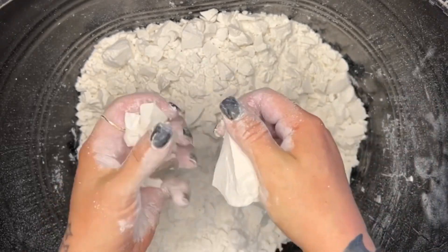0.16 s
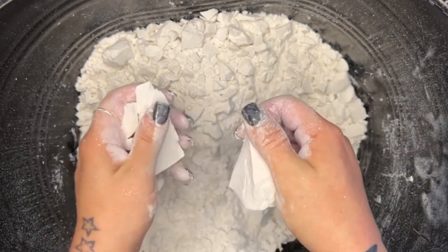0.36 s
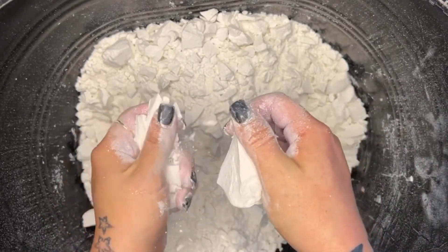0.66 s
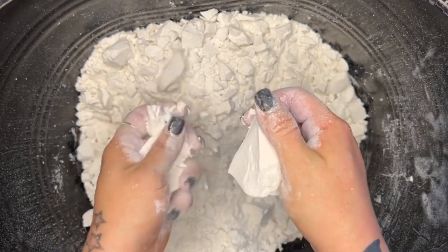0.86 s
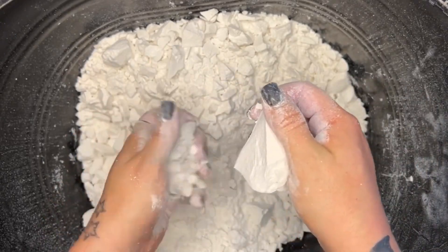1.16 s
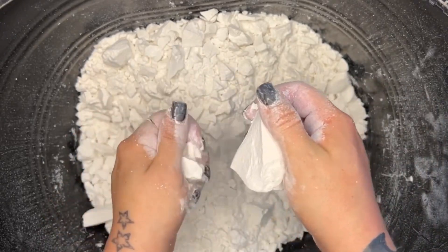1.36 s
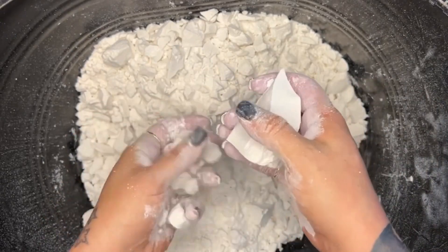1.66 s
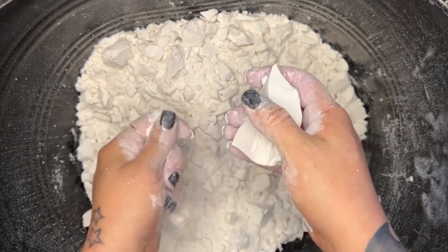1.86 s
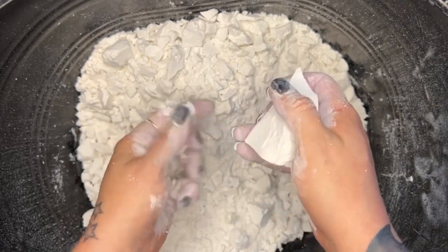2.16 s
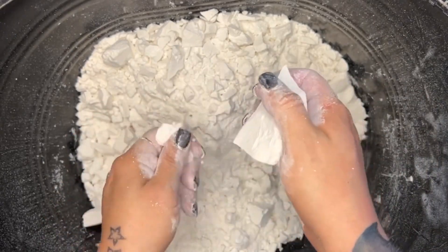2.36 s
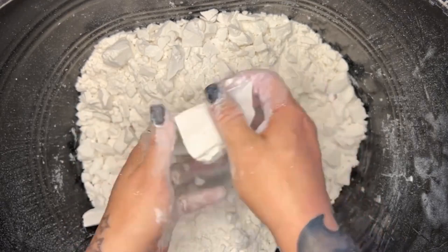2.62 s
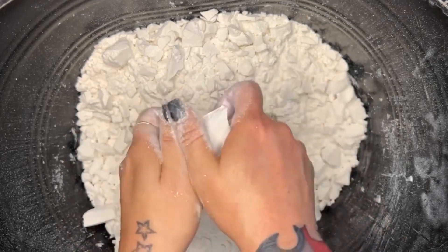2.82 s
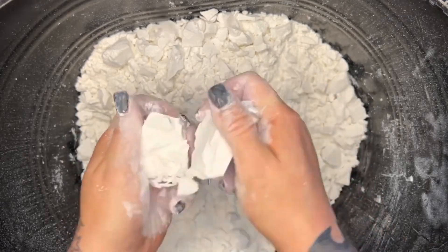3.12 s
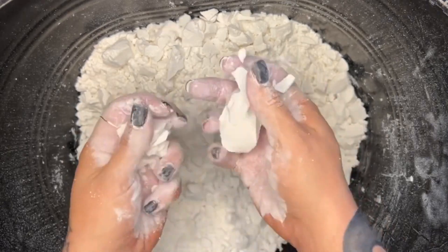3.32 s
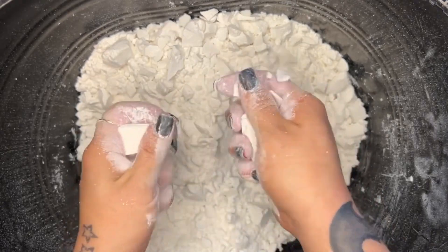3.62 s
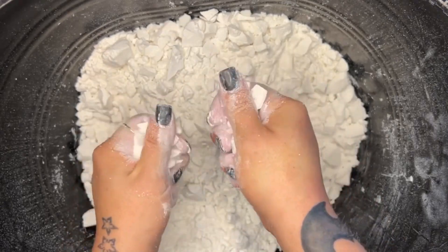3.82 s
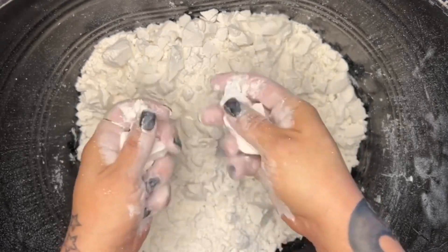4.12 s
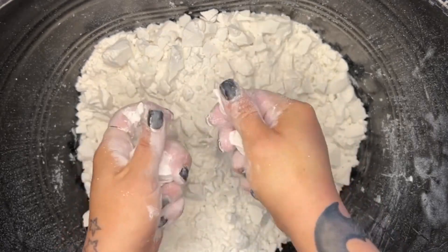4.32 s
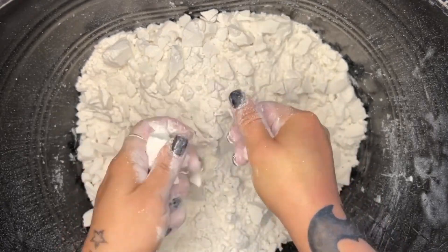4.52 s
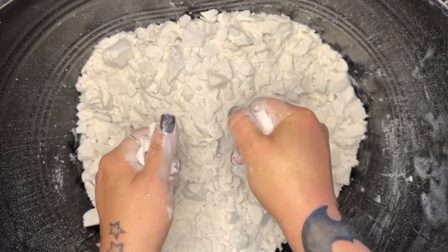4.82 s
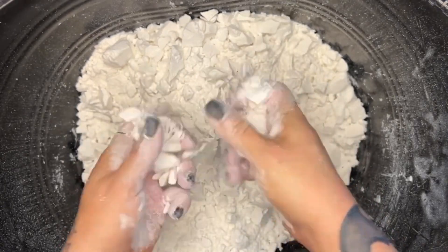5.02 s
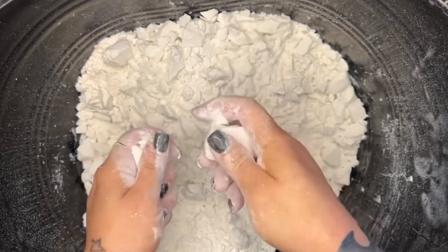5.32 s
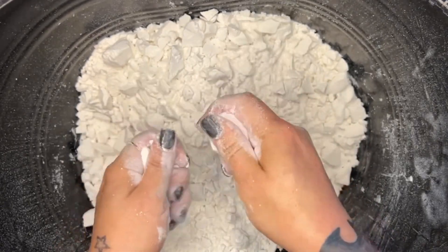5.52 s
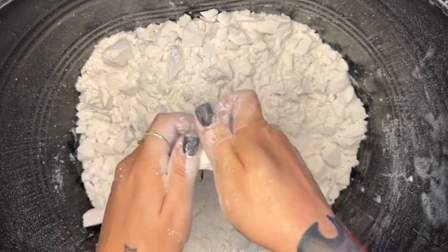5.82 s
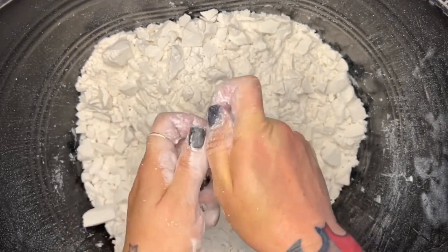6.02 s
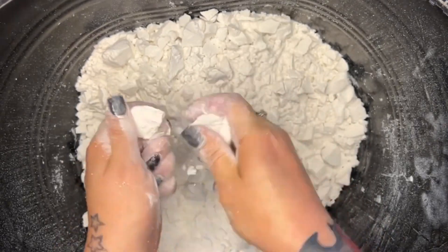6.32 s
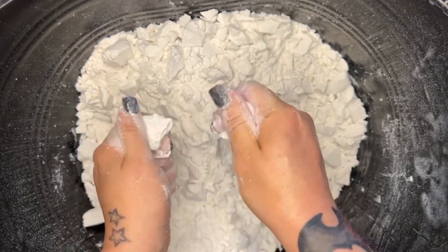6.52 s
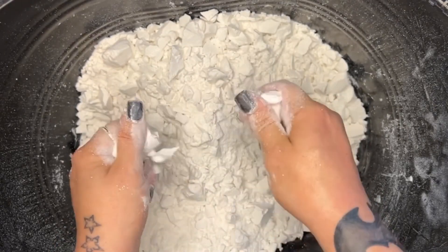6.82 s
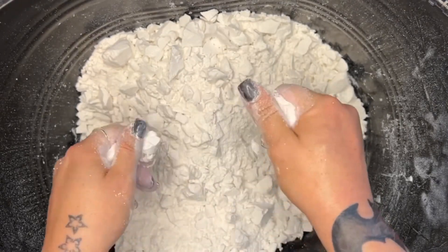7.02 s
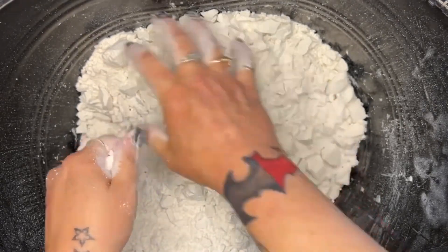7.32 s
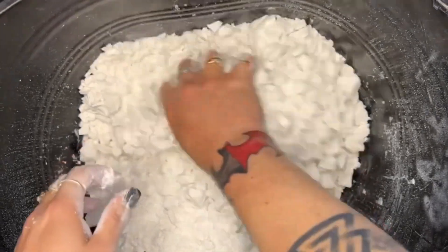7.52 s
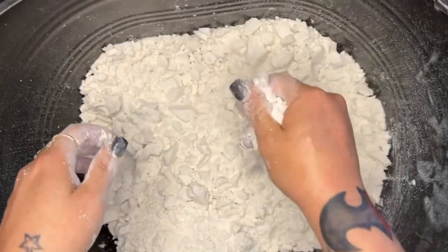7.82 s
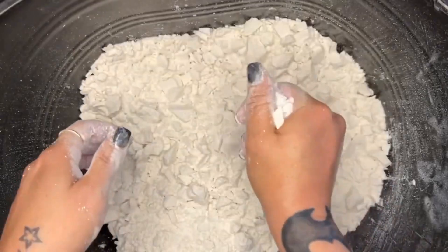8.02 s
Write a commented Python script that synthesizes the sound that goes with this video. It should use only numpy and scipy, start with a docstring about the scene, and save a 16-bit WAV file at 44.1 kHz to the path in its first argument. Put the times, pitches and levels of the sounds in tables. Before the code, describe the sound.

Crisp, dry cracks of brittle chalk breaking by hand, crumbs pattering and powder rustling, then a rough scrape and crunch through the heap.

```python
"""A faint rustle of powder comes first, over low room rumble; within a third of a second a piece cracks.
Close to the microphone, in mono, hands snap and crumble soft chalk blocks over a wide tub of chalk rubble.
Shaped noise bursts make cracks, crunches and ticking grit; damped resonances ring the knocks and rubs.
Flickering noise bands rustle as powder, wavering sines squeak; near the end a hand rakes through the heap.
Far behind lie the rumble and hiss of the room and a wavering hum, all of filtered noise."""
import sys
import numpy as np
from scipy import signal
from scipy.io import wavfile
from scipy.ndimage import uniform_filter1d

SR = 44100
rng = np.random.default_rng(int(sys.argv[2]) if len(sys.argv) > 2 else 0)


def voltage_ratio(decibels):
    """Convert decibels (scalar or array-like) to amplitude ratios, 20 dB per decade."""
    exponent = np.asarray(decibels, float) / 20
    return 10 ** exponent


def unload_audio(sound):
    """Save the sound as a 16-bit wav file, at the path given as the first command line argument."""
    columns = np.transpose(np.atleast_2d(sound))
    # keep every value between -1 and 1, then stretch to whole-number steps
    steps = np.round(np.clip(columns, -1, 1) * 32767)
    wavfile.write(sys.argv[1], SR, steps.astype(np.int16))


N = 360297   # length in samples
GRIP_DB_PER_S, SAG_DB_PER_S = 551.5, 24   # how fast a finger effort rises, and sags while held


def rms_one(x):
    """Scale to rms 1."""
    return x / np.sqrt(np.mean(x ** 2) + 1e-20)


def band(x, low_hz, high_hz, order=2):
    """Butterworth band-pass."""
    edges_hz = [low_hz, min(high_hz, .45 * SR)]
    return signal.sosfilt(signal.butter(order, edges_hz, "band", fs=SR, output="sos"), x)


def resonance(x, hz, width_hz):
    """Two-pole resonance, gain about 1 on top."""
    r = np.exp(-np.pi * width_hz / SR)
    return signal.lfilter([(1 - r * r) / 2, 0, (r * r - 1) / 2],
                          [1, -2 * r * np.cos(2 * np.pi * hz / SR), r * r], x)


def drift(rate_hz):
    """Slow random wander of rms 1: noise through two equal low-pass poles, drawn every 40 samples."""
    r = np.exp(-80 * np.pi * rate_hz / SR)
    slow = signal.lfilter([1], [1, -2 * r, r * r], rng.standard_normal(N // 40 + 2002))
    slow = rms_one(slow[2000:])   # skip the filter's start
    return np.interp(np.arange(N) / 40, np.arange(len(slow)), slow)


def coloured(spectrum, source, patchy_db):
    """Half-octave bands of two sources in turn, each flickering; typical level 1 from 1500 to 6000 Hz."""
    out, edges = 0, 11.3 * 2 ** np.arange(0, 11.1, .5)
    hz_points, db_points = np.transpose(spectrum)
    for k, (low, high) in enumerate(zip(edges, edges[1:])):
        hz = np.sqrt(low * high)
        level_db = np.interp(np.log(hz), np.log(hz_points), db_points, left=-90)
        if level_db > -80:
            flicker = voltage_ratio(level_db + patchy_db * drift(18.5))
            out = out + flicker * band(source[k % 2], low, high)
    presence = uniform_filter1d(band(out, 1500, 6000) ** 2, size=441)
    return out / np.sqrt(np.median(presence))


def pushes(rows, rise, sag, fall):
    """Gain of a row of efforts: each rises, sags while held and dies away in dB per second; powers add."""
    t, power = np.arange(0, N + 40, 40) / SR, 0
    for s, held_s, db in rows:
        late = t - s
        rising = rise * np.maximum(-late, 0)
        sagging = sag * np.clip(late, 0, held_s)
        falling = fall * np.maximum(late - held_s, 0)
        power = power + voltage_ratio(db - rising - sagging - falling) ** 2
    return np.interp(np.arange(N) / SR, t, np.sqrt(power))


def tick(burst, hz):
    """A grain bursting: a millisecond of noise in a wide band, then a faint puff of dust."""
    snap = signal.lfilter([1], [1, -np.exp(-1 / (.0012 * SR))], burst + 1e-18)
    puff = signal.lfilter([1], [1, -np.exp(-1 / (.006 * SR))], burst + 1e-18)
    noise = (snap + 0.091 * puff) * rng.standard_normal(len(burst))
    return band(noise, hz / 2.0, hz * 1.73)


# spectrum of the room far behind the tub: f/Hz, relative level per Hz/dB
ROOM_SPECTRUM = [(11, 8), (22, -1.5), (40, -12), (65, -16), (95, -15), (150, -18.5), (250, -26.5),
                 (480, -38.5), (1150, -41), (2500, -60), (7000, -53), (15500, -57)]
# noisy hum bands of some machine: f/Hz, width/Hz of each of two resonances, rms level/dB
HUM_BANDS = [(117.95, 18.2, -47), (161.4, 24, -56.5), (824, 120, -67)]


def room():
    """Distant rumble and air hiss as patchy noise; each hum is noise through two equal resonances."""
    air = voltage_ratio(-38.5) * rms_one(coloured(ROOM_SPECTRUM, rng.standard_normal((2, N)), patchy_db=5.5))
    hum = 0
    for hz, width_hz, db in HUM_BANDS:
        narrow = resonance(rng.standard_normal(N), hz, width_hz)
        hum = hum + voltage_ratio(db) * rms_one(resonance(narrow, hz, width_hz))
    return air + hum


# hands and arms shake the tub, hardest when shoving the heap:
# t/s, held/s, rumble level/dB, top of the rumble f/Hz
TUB_SHOVES = [(5.7, 0.94, -37, 28.6), (6.75, 0.7, -36, 28.3), (7.385, 0.052, -21, 169),
              (7.441, 0.13, -22.5, 29), (7.95, 0.11, -31.5, 40.3)]


def shaking():
    """The tub shudders under the hands: low noise from 11.8 Hz up follows each shove."""
    rumble = 0
    for s, held_s, db, top_hz in TUB_SHOVES:
        shudder = rms_one(band(rng.standard_normal(N), 11.8, top_hz))
        rumble = rumble + pushes([(s, held_s, db)], rise=618, sag=9, fall=123) * shudder
    return rumble


# rubble slides under the raking hand: t/s, held/s, level/dB at the start
RUBBLE_SLIDES = [(7.356, 0.27, -32)]


def rake_effort():
    """Gain of the sliding rubble: it starts abruptly, grows while held, then settles."""
    return pushes(RUBBLE_SLIDES, rise=4000, sag=-11, fall=246)


def raking():
    """Lumps knock and slide over each other: random bumps ring damped modes, the low ones louder."""
    bumps_per_s = 1100
    bumps = (rng.random(N) < bumps_per_s / SR) * rng.standard_normal(N) * voltage_ratio(2.1 * drift(59))
    slide = 0
    for hz in np.geomspace(320, 2200, 12):
        lump = resonance(bumps * rng.standard_normal(N), hz, hz / 6.1)
        slide = slide + lump * (500 / hz) ** 0.73
    return rake_effort() * rms_one(slide)


# smooth faces squeak as they rub: t/s, f/Hz, level/dB before flutter, rise/ms, fall/ms
SMOOTH_SQUEAKS = [(.345, 10300, -45, 31, 19), (.853, 10850, -37.5, 20, 3.5), (3.278, 13180, -37, 3, 5.5),
                  (3.275, 10800, -44, 12, 11), (3.297, 10100, -44, 2.5, 8), (3.325, 10250, -48, 2.5, 8),
                  (4.122, 7360, -21.5, 6.6, 8.8), (7.861, 10470, -38, 3.3, 21)]


def squeaks():
    """Stick-slip of chalk on chalk: a thin whistle, wavering in pitch and level."""
    out, t = np.zeros(N), np.arange(N) / SR
    waver = np.cumsum(1 + 0.0046 * drift(82)) / SR
    flutter = voltage_ratio(3.5 * drift(88))
    for s, hz, db, rise_ms, fall_ms in SMOOTH_SQUEAKS:
        near = slice(round((s - .1) * SR), round((s + .15) * SR))
        late_ms = (t[near] - s) * 1000
        shape = np.exp(-np.where(late_ms < 0, (late_ms / rise_ms) ** 2, late_ms / fall_ms))
        whistle = np.sin(2 * np.pi * hz * waver[near])
        out[near] += voltage_ratio(db) * shape * flutter[near] * whistle
    return out


# broken faces rub briefly against each other: t/s, held/s, level/dB at the start, f/Hz
FACE_RUBS = [(2.299, 0.022, -53, 2630), (2.389, 0.057, -50, 2630), (3.86, 0.042, -51, 2980),
             (7.565, 0.083, -36.5, 1490)]


def rubs():
    """Gritty noise gathered in one resonance of the lump."""
    gritty = rng.standard_normal(N) * voltage_ratio(4.4 * drift(70))
    out = 0
    for s, held_s, db, hz in FACE_RUBS:
        effort = pushes([(s, held_s, db)], GRIP_DB_PER_S, SAG_DB_PER_S, fall=400)
        out = out + effort * rms_one(resonance(gritty, hz, hz / 6.2))
    return out


# spectrum of rustling powder: f/Hz, relative level per Hz/dB
RUSTLE_SPECTRUM = [(300, -3), (700, 5.5), (1400, -11.5), (2300, 1.5), (4500, 1), (7300, 1), (11000, -6),
                   (15000, -16.5)]
# the fingers squeeze and grind: t/s, held/s, rustle level/dB at the start
FINGER_SQUEEZES = [(0.0, 0.37, -61.5), (.215, 0.01, -51), (.47, 0.046, -48.5), (.54, 0.023, -49.5),
                   (.65, 0.31, -59.5), (.845, 0.17, -50.5), (1.125, 0.0086, -57), (1.2, 0.17, -53),
                   (1.44, 0.19, -58.5), (1.7, 0.082, -54), (1.8, 0.023, -48.5), (1.92, 0.35, -59.5),
                   (2.3, 0.036, -54), (2.5, 0.45, -63.5), (2.9, 0.15, -63.5), (3.105, 0.0075, -53.5),
                   (3.22, 0.096, -58), (3.42, 0.12, -62), (3.56, 0.14, -53.5), (3.7, 0.18, -49),
                   (4.055, 0.043, -54), (4.115, 0.01, -45), (4.2, 0.24, -61.5), (4.54, 0.74, -51.5),
                   (4.82, 0.026, -61), (5.105, 0.59, -55.5), (5.61, 0.12, -55), (5.81, 0.077, -59),
                   (6.185, 0.011, -60.5), (6.37, 0.17, -56), (6.6, 0.62, -53.5), (7.17, 0.11, -53.5),
                   (7.72, 0.12, -52.5), (7.86, 0.22, -53.5)]


def crumbling():
    """Powder rustles in clumps; small grains tick at random, in bunches, the coarse ones lower and louder."""
    idle_db, raked_powder_db = -79.5, -14.5   # untouched powder; powder stirred up, below the rubble
    grains_db, grains_per_s = 6, 380   # gain beside the rustle; rate before bunching
    effort = pushes(FINGER_SQUEEZES, GRIP_DB_PER_S, SAG_DB_PER_S, fall=140) + voltage_ratio(idle_db)
    effort = effort + voltage_ratio(raked_powder_db) * rake_effort()
    clumps = voltage_ratio(0.91 * drift(14.0) + 3.9 * drift(130))
    powder = coloured(RUSTLE_SPECTRUM, rng.standard_normal((2, N)) * clumps, patchy_db=3.3)

    born = rng.random(N) < grains_per_s * voltage_ratio(4.0 * drift(8)) / SR
    sizes = born * voltage_ratio(4 * np.minimum(rng.exponential(1, N), 3))
    pitch_index = rng.integers(0, 8, N)
    grains = 0
    for k, hz in enumerate(np.geomspace(1800, 10000, 8)):
        grains = grains + tick(sizes * (pitch_index == k), hz) * (4000 / hz) ** .7
    return effort * (powder + voltage_ratio(grains_db) * grains)


# the loudest single grains of grit: t/s, peak level/dB, centre f/Hz
GRIT_GRAINS = [(0.1166, -29, 6470), (0.289, -32.5, 4500), (0.485, -17, 6000), (0.571, -21, 2790),
               (0.677, -29.5, 4870), (1.029, -26, 4300), (1.2184, -36, 5500), (1.226, -29.5, 4770),
               (1.2593, -31, 2600), (1.332, -28.5, 5140), (1.364, -27, 2510), (1.435, -24, 3330),
               (1.444, -24.5, 3230), (1.531, -29.5, 3300), (1.6058, -26.5, 6900), (1.674, -31, 4000),
               (1.7945, -25.5, 5530), (1.801, -24, 6100), (1.815, -42, 5340), (1.874, -24.5, 5570),
               (1.9374, -21.5, 4670), (1.959, -14.5, 5940), (2.323, -25.5, 3520), (2.4242, -28.5, 2830),
               (3.092, -27, 4960), (3.114, -22, 2650), (3.223, -24.5, 4750), (3.2764, -22.5, 8140),
               (3.2856, -24.5, 2240), (3.2958, -24.5, 4180), (3.3963, -31, 3850), (3.789, -28, 4000),
               (3.805, -23.5, 3170), (3.883, -31, 3300), (3.9677, -34, 3300), (3.987, -29.5, 4440),
               (4.079, -27, 7500), (4.096, -24, 2820), (4.145, -33, 3200), (4.159, -35, 5000),
               (4.173, -31, 6000), (4.185, -40, 4000), (4.2313, -37, 4000), (4.4107, -30, 4170),
               (4.503, -27.5, 5070), (4.783, -19, 4230), (4.8683, -20, 5150), (5.1445, -27, 5000),
               (5.22, -23.5, 7150), (5.4034, -25, 4540), (5.8067, -30, 3840), (5.832, -28, 3470),
               (6.183, -27, 6000), (6.479, -25, 4020), (6.551, -25, 3400), (6.6316, -21, 6200),
               (6.653, -19.5, 3600), (6.691, -26.5, 5700), (6.737, -19.5, 5300), (6.762, -20, 4700),
               (6.799, -24, 3770), (6.855, -20.5, 4830), (7.0988, -24, 4300), (7.113, -27.5, 4120),
               (7.199, -21.5, 6830), (7.326, -28.5, 4600), (7.725, -22.5, 4270), (7.78, -28, 4900),
               (7.8382, -21.5, 4150), (7.962, -20.5, 8600), (8.0125, -24, 3020), (8.0397, -20, 2700)]


def grit():
    """Single grains burst, each a short tick of noise around its own pitch."""
    out, burst = np.zeros(N + 2048), np.arange(2048) == 0
    for s, peak_db, hz in GRIT_GRAINS:
        one, at = tick(burst, hz), round(s * SR)
        out[at:at + 2048] += voltage_ratio(peak_db) * one / np.abs(one).max()
    return out[:N]


# dull knocks of lumps against hand, heap or tub: t/s, peak level/dB, f/Hz
LUMP_KNOCKS = [(0.582, -21, 332), (0.905, -19, 940), (0.95, -24, 350), (1.605, -33, 320),
               (2.207, -35.5, 211), (2.313, -34.5, 347), (2.525, -30, 358), (2.826, -34, 566),
               (2.929, -14, 290), (3.1, -26, 272), (3.624, -15, 790), (3.663, -17.5, 740),
               (3.691, -22, 870), (4.534, -28.5, 824), (4.697, -25.5, 513), (4.782, -25, 340),
               (5.088, -35, 1090), (5.161, -28.5, 338), (5.618, -35.5, 344), (6.075, -28.5, 328),
               (6.454, -29.5, 320), (6.994, -17.5, 246), (7.234, -33, 284), (7.572, -14, 507),
               (7.866, -24.5, 635), (7.905, -24, 210)]


def knocks():
    """A soft blow rings a damped low mode for a few cycles, with a scratchy top."""
    out, t = np.zeros(N + 4096), np.arange(4096) / SR
    for s, peak_db, hz in LUMP_KNOCKS:
        blow = rng.standard_normal(4096) * voltage_ratio(-60 * t / 0.039)
        blow[0] += 4.0
        ring = resonance(blow, hz, hz / 2.9) + 0.08 * band(blow, hz, 2700, order=1)
        at = round(s * SR)
        out[at:at + 4096] += voltage_ratio(peak_db) * ring / np.abs(ring).max()
    return out[:N]


# chunks crunched in the heap as the raking hand closes: t/s, peak level/dB, f/Hz
HEAP_CRUNCHES = [(7.557, -18, 1720), (7.569, -12.5, 1700), (7.587, -10, 1720), (7.603, -12.5, 1800)]


def crunches():
    """A chunk gives way in a few uneven breaks that ring its own pitch, with a broad crackle around it."""
    ring_q, t60_s = 8, 0.019
    out, t = np.zeros(N + 4096), np.arange(4096) / SR
    for s, peak_db, hz in HEAP_CRUNCHES:
        uneven_db = 1.8 * rms_one(band(rng.standard_normal(4096), 100, 500))
        breaks = rng.standard_normal(4096) * voltage_ratio(uneven_db - 60 * t / t60_s)
        ring = resonance(breaks, hz, hz / ring_q) + 0.13 * band(breaks, hz / 2, hz * 2)
        at = round(s * SR)
        out[at:at + 4096] += voltage_ratio(peak_db) * ring / np.abs(ring).max()
    return out[:N]


# resonances of chalk and tub that colour every crack: f/Hz before a small random shift, width/Hz, level/dB
CHALK_BODY = [(870, 390, 1), (2163, 192, 0), (6200, 3600, -12)]
# cracks close to the microphone: t/s, snap peak level/dB before clipping, centre f/Hz,
# level/dB of the crumb shower relative to that peak
CHALK_CRACKS = [(0.2541, -7.5, 7040, -48), (0.4328, -9, 8100, -14), (0.4388, -12, 7400, -21),
                (0.458, -11, 5430, -15), (0.499, -12, 5350, -14), (0.5087, 3, 3520, -22.5),
                (0.582, 7, 3340, -28), (0.883, -11.5, 6500, -29), (0.9043, 4, 3560, -22.5),
                (0.916, -10, 3650, -35), (0.9532, -5, 4320, -20), (0.9782, -21.5, 3730, -8.5),
                (1.8318, -16, 5360, -30), (1.95, -7.5, 5250, -16.5), (2.933, -11.5, 3080, -9.5),
                (2.9417, -8.5, 3440, -8), (2.957, 3.5, 3340, -25.5), (3.514, -14.5, 4100, -45),
                (3.6258, -3, 4200, -27), (3.6657, 2, 3550, -26.5), (3.69, 0.5, 3660, -17.5),
                (3.751, -12, 5060, -18), (3.762, -12.5, 5660, -43), (3.833, -8.5, 5330, -43),
                (3.854, -17.5, 4570, -19), (4.2587, -2, 2870, -36), (4.532, 3, 4330, -51),
                (4.5633, -16, 4400, -8.5), (4.6053, -9.5, 5800, -29), (4.6516, -17, 4740, -41),
                (4.688, -10, 5100, -22), (4.6974, -11, 4670, -19), (4.7209, -13, 4660, -30),
                (4.73, -8.5, 3720, -17.5), (5.1604, -16, 4550, -13.5), (5.1637, -10.5, 4530, -25),
                (5.8425, -16.5, 3400, -26), (6.077, -13.5, 5150, -22.5), (6.3469, -14.5, 5920, -25),
                (6.4539, -10, 3700, -29), (6.575, -13.5, 3900, -28), (6.769, -19.5, 3250, -29),
                (6.867, -17, 4380, -21), (6.992, -7.5, 2130, -16), (7.1721, -11, 3600, -17.5),
                (7.1767, -8, 5500, -44), (7.6327, -8, 1910, -21), (7.9034, -26, 3230, -5.5),
                (7.935, -31.5, 4100, 0)]


def cracks():
    """A snap, then a dying spray of smaller breaks banded by the piece's size; then crumbs shower down."""
    fall_db_per_cycle, fall_spread_db = 1.72, -0.97   # big low pieces keep breaking longer; chance per crack
    push_db, push_ms, shower_t60_s = -26.5, 0.46, 0.085
    out, t = np.zeros(N + 4096), np.arange(4096) / SR
    # the halves jerk apart: a short push of air under each crack
    jerk = t * 1000 / push_ms
    push = voltage_ratio(push_db) * jerk * (2 - jerk) * np.exp(1 - jerk)
    for s, peak_db, hz, shower_db in CHALK_CRACKS:
        noise = rng.standard_normal((3, 4096))
        fall = fall_db_per_cycle * voltage_ratio(fall_spread_db * noise[2, 0])
        spray = noise[0] * voltage_ratio(-fall * hz * t) * (1 - np.exp(-t / .0004))
        spray[3] += 3.9 * np.sign(noise[0, 3])   # the first break
        snap = band(spray, hz / 1.636, hz * 1.225, order=1)
        snap = 0.61 * band(snap, 83, hz * 3.27, order=1)
        direct = band(band(spray, hz / 1.636, hz * 1.225, order=1), 83, hz * 3.27, order=1)
        shift = voltage_ratio(0.25 * noise[2, 1])
        for body_hz, width_hz, db in CHALK_BODY:
            snap = snap + voltage_ratio(db) * resonance(direct, body_hz * shift, width_hz)
        snap /= np.abs(snap).max()

        uneven = voltage_ratio(3 * rms_one(band(noise[2], 60, 400)))
        crumbs = band(noise[1] * uneven, hz / 2.23, hz * 2.0, order=1)
        crumbs = rms_one(band(crumbs, 140, hz * 2.1, order=1))
        shower = crumbs * voltage_ratio(shower_db - 60 * t / shower_t60_s)
        at = round(s * SR)
        out[at:at + 4096] += voltage_ratio(peak_db) * (snap + shower + push)
    return out[:N]


def scene():
    """Everything in the tub is close and dry, in one channel, over the distant room."""
    background = room() + shaking() + raking()
    fingers = squeaks() + rubs() + crumbling() + grit()
    return (background + fingers + knocks() + crunches() + cracks())[None]


def top_cut(x):
    """Nothing passes above the cut-off."""
    return signal.sosfilt(signal.butter(12, 16620, fs=SR, output="sos"), x)


def record(dry):
    """The microphone signal clips where the loudest cracks pass full scale; a steep low-pass cuts the top."""
    low_pass = signal.cheby2(14, 30, 15600, fs=SR, output="sos")
    mix = signal.sosfilt(low_pass, np.clip(dry, -1, 1))
    return top_cut(mix)


dry = scene()
out = record(dry)
unload_audio(out)
```